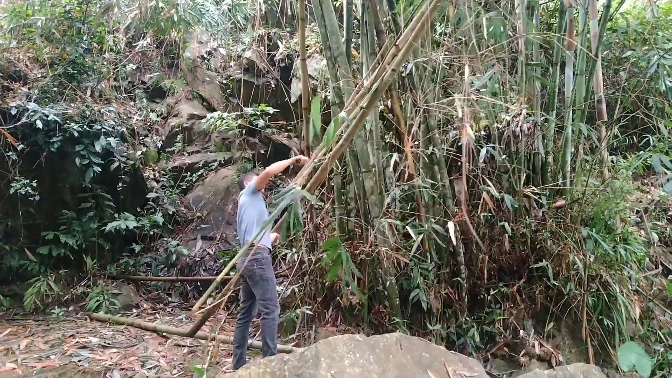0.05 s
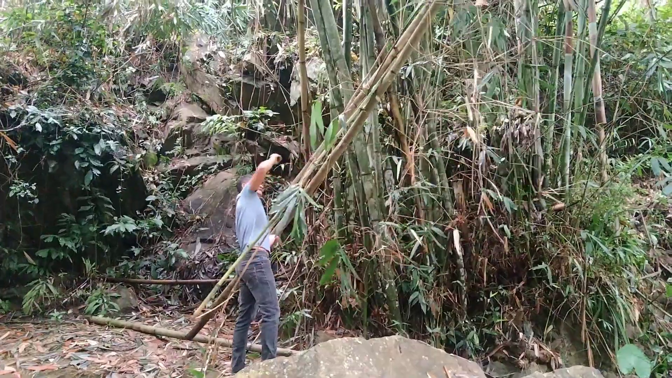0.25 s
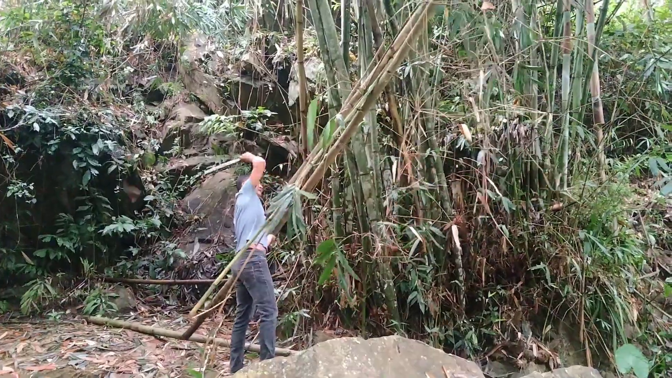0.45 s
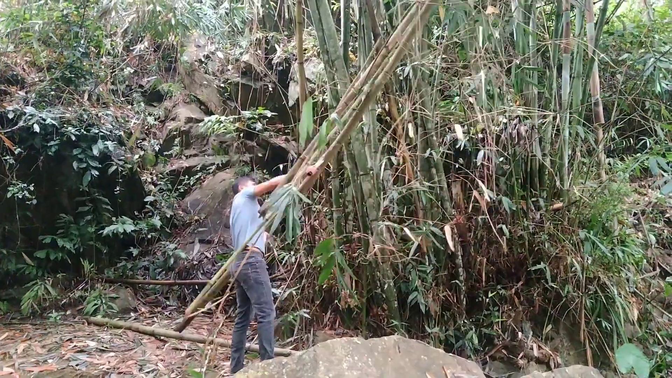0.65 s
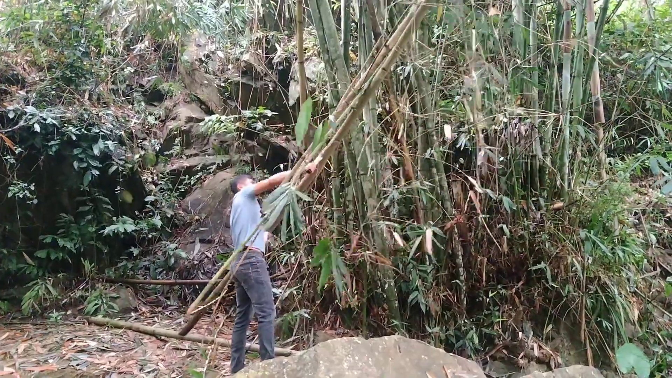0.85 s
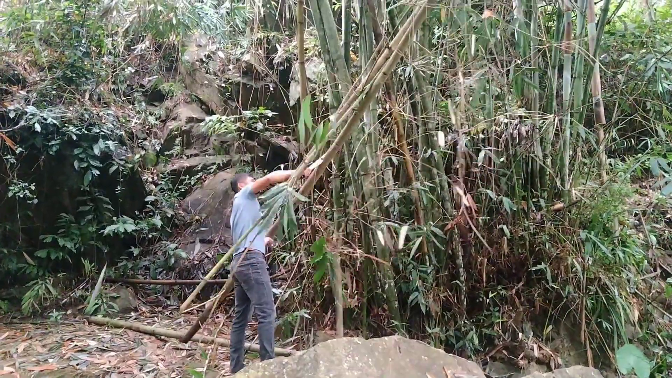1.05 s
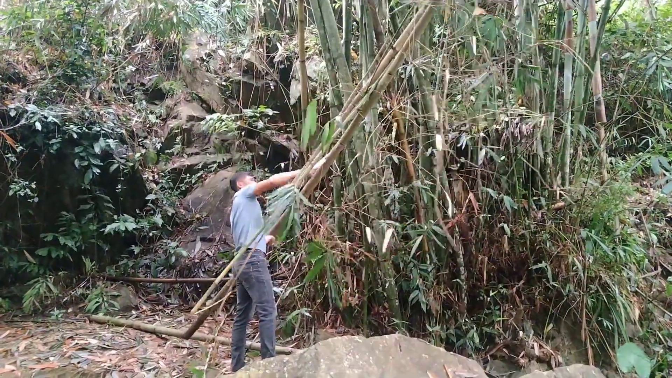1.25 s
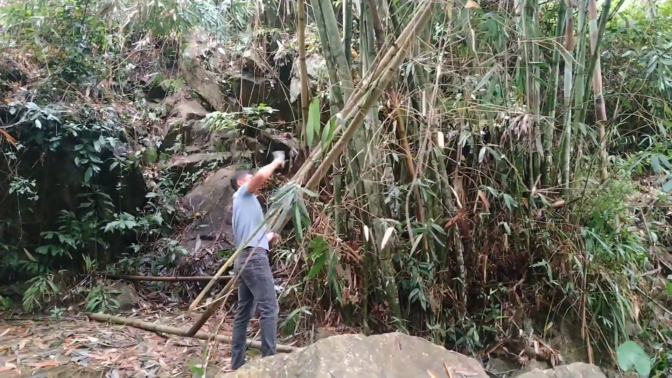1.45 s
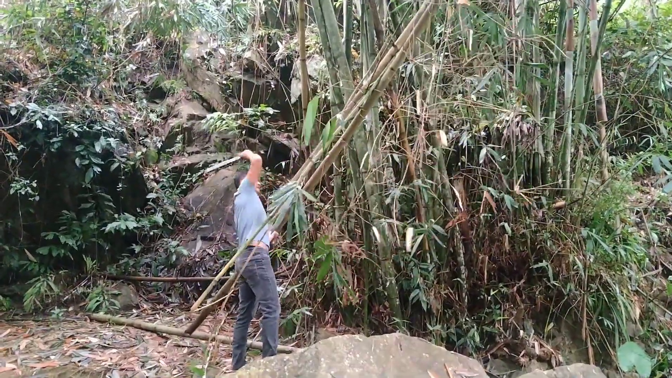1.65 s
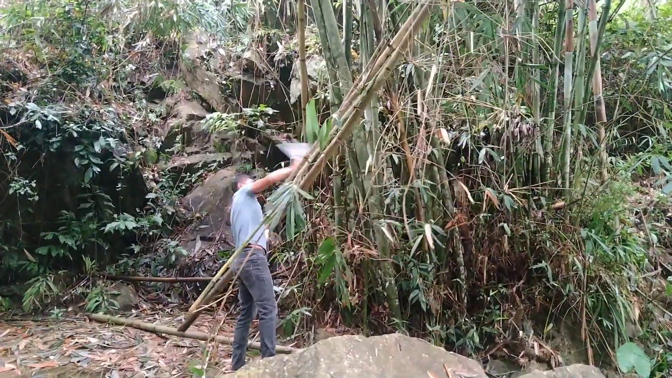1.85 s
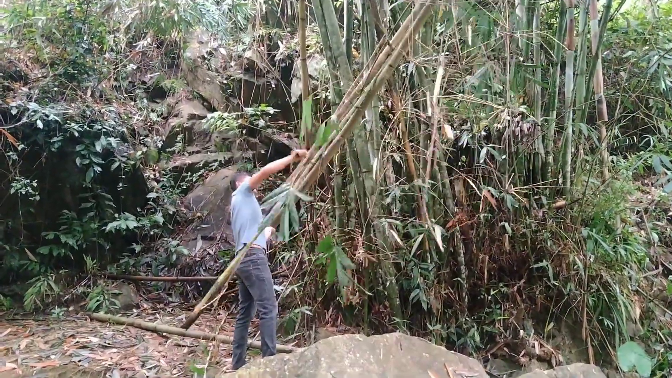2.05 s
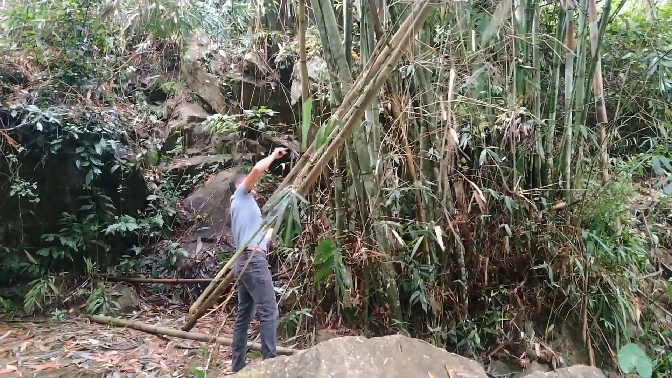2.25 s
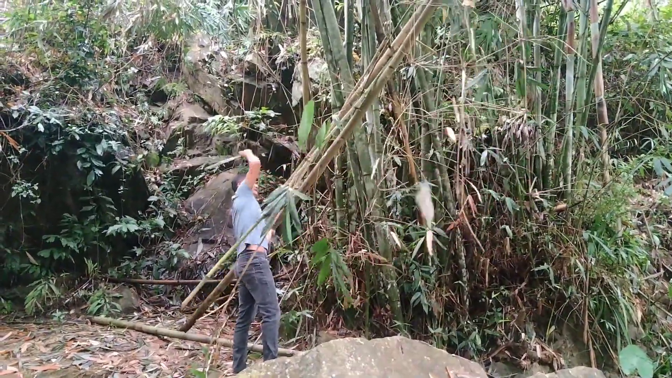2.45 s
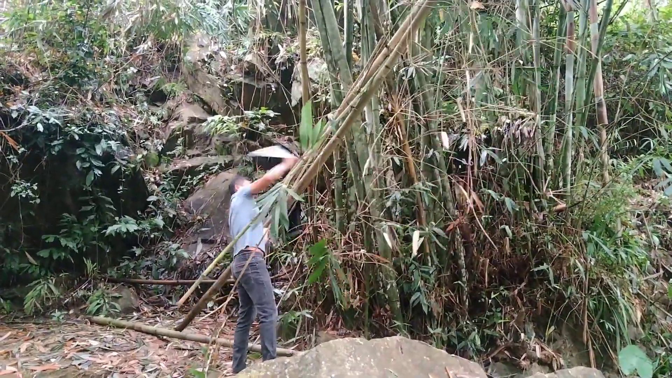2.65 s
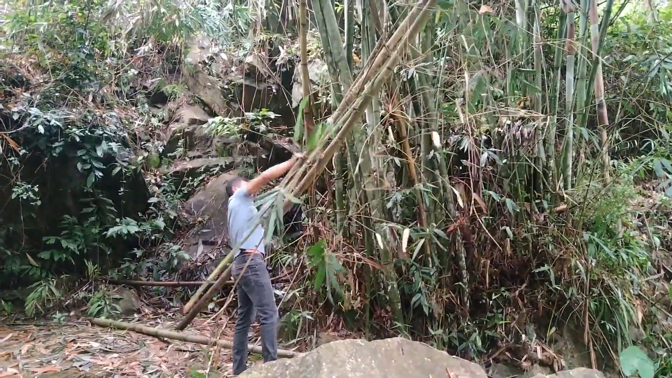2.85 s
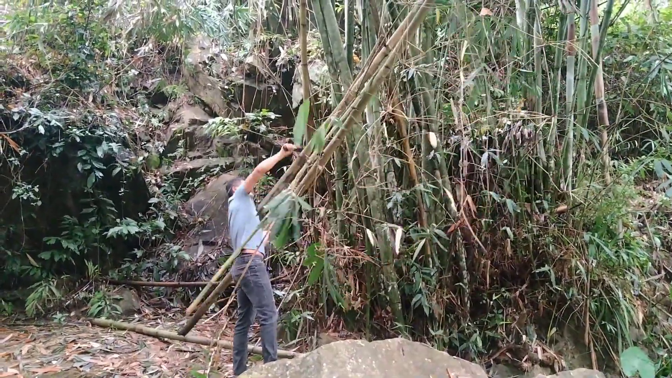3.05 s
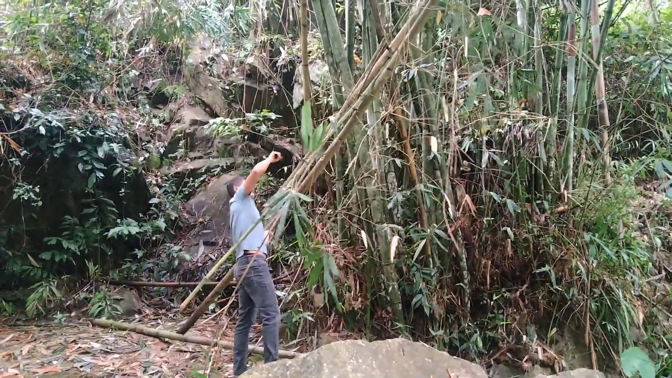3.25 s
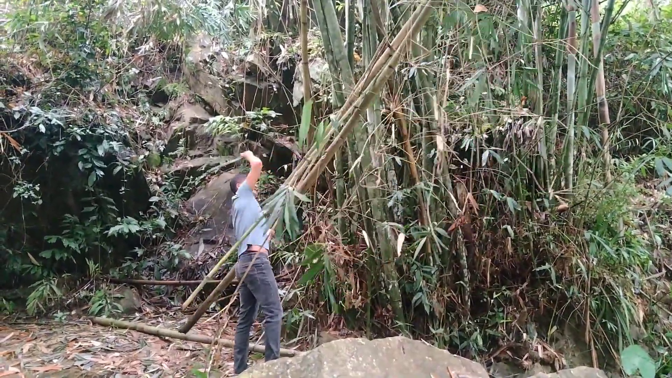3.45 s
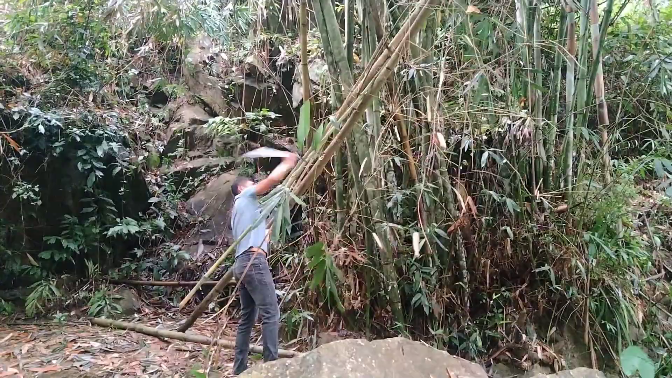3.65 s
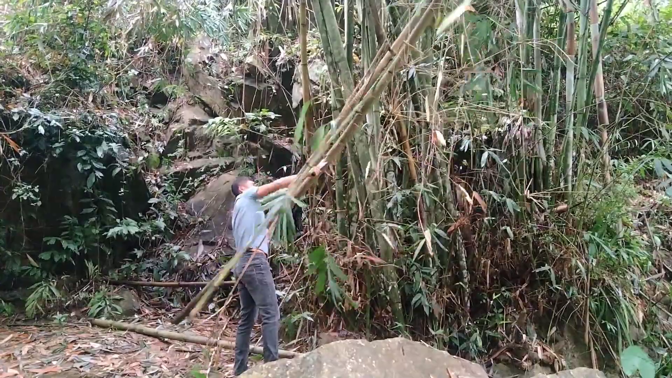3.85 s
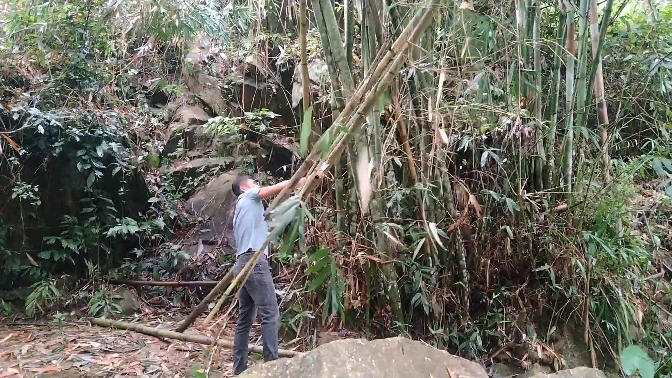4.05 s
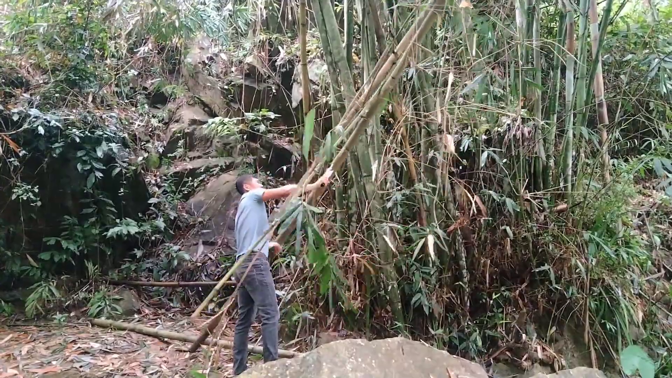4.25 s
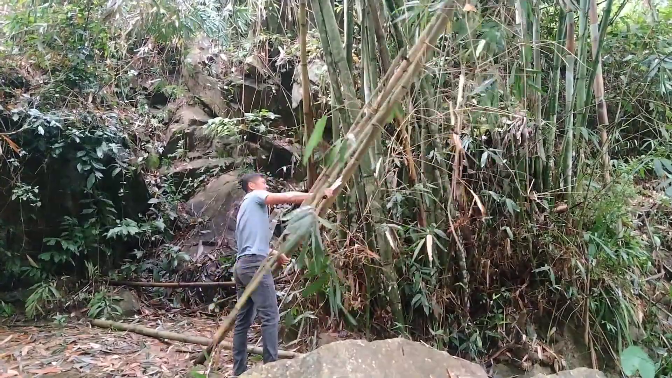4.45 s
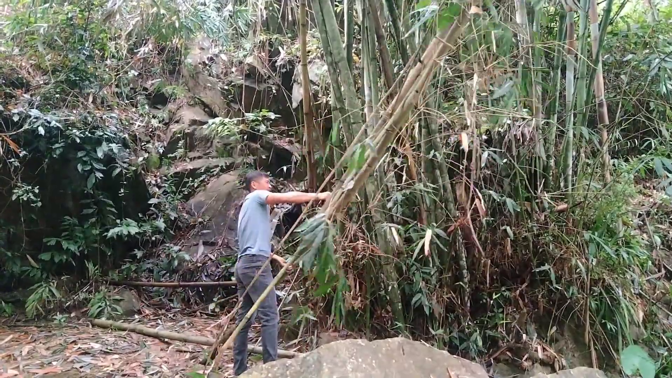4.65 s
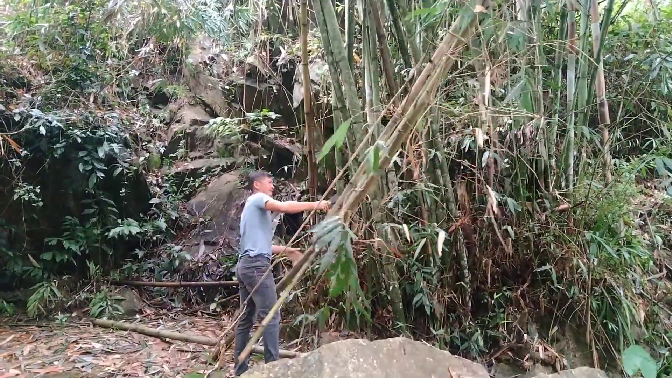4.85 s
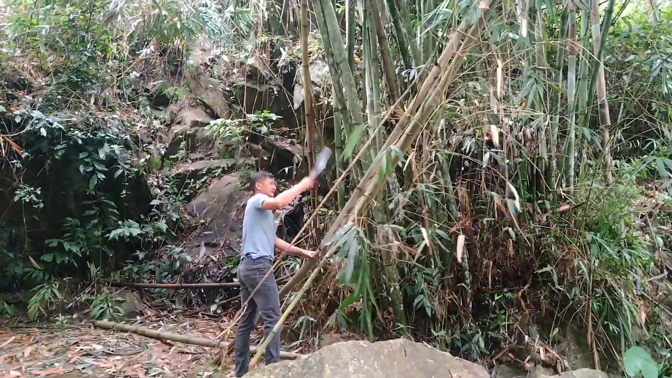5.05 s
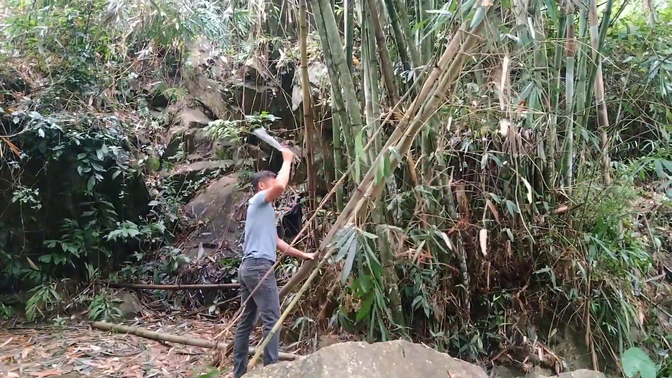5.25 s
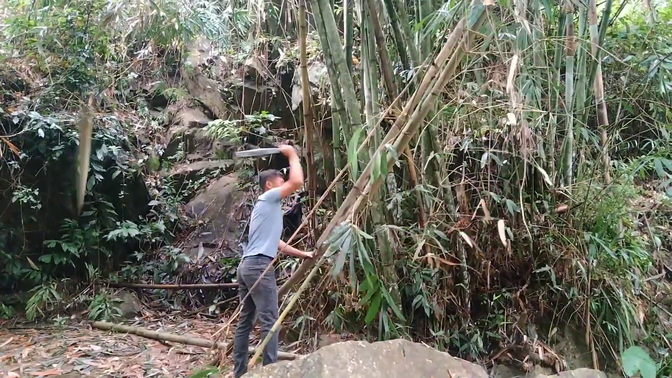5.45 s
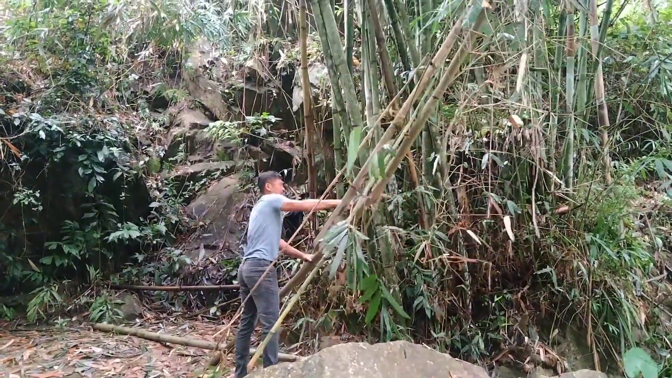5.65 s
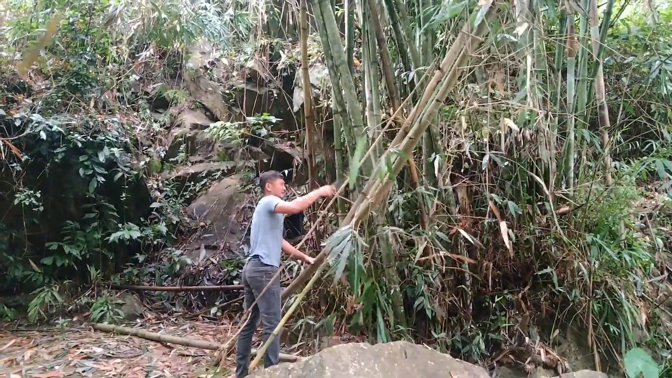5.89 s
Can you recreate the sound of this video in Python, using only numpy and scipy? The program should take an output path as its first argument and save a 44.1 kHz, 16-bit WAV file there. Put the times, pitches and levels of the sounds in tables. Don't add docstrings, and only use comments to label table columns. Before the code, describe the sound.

Five woody chops ring through a bamboo grove with short rocky echoes, dry leaf rattle, splinter ticks and a faint blade clink beside running water.

```python
import sys
import numpy as np
from scipy import signal
from scipy.fft import rfft, irfft
from scipy.io import wavfile
from scipy.ndimage import uniform_filter1d, map_coordinates

SR = 44100
rng = np.random.default_rng(int(sys.argv[2]) if len(sys.argv) > 2 else 0)


def inscribe(sig):
    pcm = np.round(np.clip(np.atleast_2d(sig).T, -1, 1) * 32767)
    wavfile.write(sys.argv[1], SR, pcm.astype(np.int16))


def decibels_to_gain(level_db):
    exponent = np.asarray(level_db, float) / 20
    return 10 ** exponent


N = 261072
T = np.arange(SR // 2) / SR


def unit(x):
    return x / np.sqrt(np.mean(x ** 2) + 1e-20)


def along(points, hz):
    f, v = np.transpose(points)
    return np.interp(np.log(hz + 1), np.log(f + 1), v)


def curve(rows):
    return decibels_to_gain(np.interp(np.arange(N) / SR, *np.transpose(rows)))


def wobble(rate):
    knots = rng.standard_normal(int(N * rate / SR) + 4)
    return map_coordinates(knots, [np.arange(N) * rate / SR])


def coloured(x, spectrum):
    cepstrum = irfft(np.log(decibels_to_gain(along(spectrum, np.fft.rfftfreq(8192, 1 / SR)))))
    cepstrum[1:4096] *= 2
    cepstrum[4097:] = 0
    response = irfft(np.exp(rfft(cepstrum)))
    return signal.fftconvolve(x, response)[:len(x)]


def ring(hz, t60, attack=0.00043):
    return np.sin(2 * np.pi * hz * T) * decibels_to_gain(-60 * T / t60) * (1 - np.exp(-T / attack))


def bright_noise():
    return np.diff(rng.standard_normal(len(T) + 1))


def add(track, s, sound):
    part = track[round(s * SR):][:len(sound)]
    part += sound[:len(part)]


def spiky(size, density, spread_db):
    hit = rng.random(size) < np.clip(density, 0, 1)
    return unit(hit * rng.standard_normal(size) * decibels_to_gain(spread_db * rng.exponential(1, size)))


# start_s, level_db
STREAM_LEVEL = [(0, -39.5), (2, -40), (4.3, -39), (5.7, -40), (5.92, -37)]
# pitch_hz, level_db (per Hz)
WATER_TONE = [(30, -18), (60, 0), (100, 2.5), (160, -6), (250, -3), (600, 4.5), (1500, 3.5), (2500, 3),
              (5000, -7), (8000, 0.5), (11000, -6), (15000, 1.5)]


def stream():
    z = signal.stft(rng.standard_normal(N), nperseg=512)[2]
    patches = uniform_filter1d(rng.standard_normal(z.shape), size=6, axis=0)
    patches = unit(uniform_filter1d(patches, size=8, axis=1))
    hiss = signal.istft(z * decibels_to_gain(1.28 * patches), nperseg=512)[1][:N]
    hiss = unit(coloured(hiss, WATER_TONE))

    when, pitch, size = rng.random((3, 2500))
    hz = 700 * 4.5 ** pitch[:, None]
    t = T[:600]
    life = t * hz / 9
    swell = decibels_to_gain(5.3 * size[:, None] ** 2) * life * np.exp(-5 * life)
    drops = swell * np.sin(2 * np.pi * hz * t * (1 + .15 * life))
    where = (when * N).astype(int)[:, None] + np.arange(len(t))
    bubbles = unit(np.bincount(where.ravel(), drops.ravel())[:N])

    surge = decibels_to_gain(.5 * wobble(9) + .8 * wobble(35))
    return curve(STREAM_LEVEL) * decibels_to_gain(8) * surge * (hiss + decibels_to_gain(-11.5) * bubbles)


# pitch_hz, level_db (per Hz)
LEAF_TONE = [(200, -19.5), (800, 17.5), (2500, 10.5), (6000, 7), (10000, 7), (15000, -17)]
# start_s, level_db
LEAF_SHAKES = [(.77, -28.5), (1.07, -53), (1.13, -44.5), (2.025, -30), (2.119, -34), (2.85, -27),
               (2.95, -40), (3.462, -40.5), (3.866, -26.5), (3.99, -42), (4.28, -53), (4.66, -48.5),
               (4.81, -47.5), (5.74, -26), (5.779, -27), (5.87, -46)]


def leaves():
    rise_s, scrape_t60_s, patter_t60_s = 0.014, 0.37, 1.3
    patter_db, still_db = -14.5, -54
    start_s, level_db = np.transpose(LEAF_SHAKES)[:, :, None]
    since = np.maximum(np.arange(N) / SR - start_s, 0)
    swell = decibels_to_gain(level_db + 6) * (1 - np.exp(-since / rise_s)) ** 2

    def shaking(t60):
        return np.sqrt(((swell * decibels_to_gain(-60 * since / t60)) ** 2).sum(axis=0))

    clumps = spiky(N, density=.3, spread_db=1.5) * decibels_to_gain(1.9 * wobble(40))
    scrape = unit(coloured(clumps, LEAF_TONE))
    patter = unit(np.diff(coloured(spiky(N + 1, density=.3, spread_db=2.0), LEAF_TONE)))
    scraping = (shaking(scrape_t60_s) + decibels_to_gain(still_db)) * scrape
    return decibels_to_gain(8) * (scraping + decibels_to_gain(patter_db) * shaking(patter_t60_s) * patter)


# pitch_hz, level_db (per Hz)
TEARING_TONE = [(100, -35.5), (350, -12), (700, 9), (1200, 1), (2600, -6.5), (3600, -9.5), (6000, -7),
                (10000, -12.5), (15000, -10.5)]


def crack(db, hz, tear_db):
    tear = unit(coloured(spiky(len(T), density=0.45, spread_db=1.0), TEARING_TONE))
    puff = decibels_to_gain(tear_db) * tear * decibels_to_gain(-60 * T / 0.022)
    return decibels_to_gain(db + 6.5) * (ring(hz, 9 / hz) + puff)


# pitch_hz, t60_s
GROVE_DECAY = [(150, 0.51), (400, 0.35), (1000, 0.23), (2800, 0.33), (7000, 0.3), (15000, 0.32)]


def grove(sound, echo_db):
    hz, t, z = signal.stft(rng.standard_normal(len(T)), SR, nperseg=256)
    fading = z * decibels_to_gain(-60 * t / along(GROVE_DECAY, hz)[:, None])
    tail = signal.istft(fading, SR, nperseg=256)[1][:len(T)]
    rocks = 0.27 / (1 + np.exp((.024 - T) / 0.0021))
    first_answer = 0.2 * np.exp(-.5 * ((T - .028) / 0.0054) ** 2)
    tail *= .5 + rocks + first_answer
    return decibels_to_gain(echo_db) * signal.fftconvolve(sound, tail / np.linalg.norm(tail))


# start_s, level_db (peak), pitch_hz
BLOW_CRACKS = [
    [(.7676, -5, 2270), (.7702, -4.5, 2390), (.7735, -6.5, 890), (.7778, -7, 2140), (.781, -17, 1950),
     (.7945, -24, 1510), (.801, -18, 2000)],
    [(2.0236, -12, 2540), (2.0295, -11, 2720), (2.0315, -8.5, 1430), (2.0355, -8, 1280)],
    [(2.8463, -3.5, 1390), (2.848, -3, 1310), (2.852, -3.5, 1430), (2.8555, -5.5, 2560), (2.859, -5, 2560),
     (2.876, -9, 1250)],
    [(3.8632, -9.5, 1390), (3.867, -3.5, 4130), (3.8685, -8.5, 1000), (3.8716, -4.5, 1500),
     (3.878, -17, 730), (3.9365, -28, 1420)],
    [(5.7343, -4.5, 980), (5.7365, -12, 1250), (5.7398, -6, 860), (5.7425, -13, 2000), (5.7493, -12, 1900),
     (5.759, -6.5, 1890), (5.7645, -6, 1500)],
]
# pitch_hz, width_hz, level_db
STEM_WALLS = [
    [(344, 110, -4), (1392, 17, 4), (1510, 38, -1), (2000, 20, 4), (2510, 37, -6)],
    [(385, 44, 13), (790, 52, 7), (1250, 170, -2), (2010, 26, -16), (2800, 25, -22)],
    [(323, 150, -21), (1300, 110, -20), (1390, 120, -0.5), (2450, 46, 2), (2850, 90, -8)],
    [(312, 33, -36), (1590, 180, 9), (1770, 45, -6), (2420, 260, 7), (3050, 16, -30)],
    [(623, 330, 15), (1380, 87, 2), (1880, 26, -26), (2000, 37, -15), (2410, 140, 6)],
]
# stem_ring_db, hollow_hz, hollow_db, steel_edge_db, tearing_db
BLOW_LEVELS = [(5, 348, -7, -5, -9.5), (-3.5, 430, -10, -4.5, -10.5), (2, 325, -3, -5.5, -7.5),
               (4, 319, -7.5, -20, -5), (4.5, 618, 1, -8.5, -3.5)]
STEM_SWAY = [176.6, 184, 175, 239, 236]


def chops():
    out = np.zeros(N)
    for cracks, stem, sway_hz, levels in zip(BLOW_CRACKS, STEM_WALLS, STEM_SWAY, BLOW_LEVELS):
        ring_db, hollow_hz, hollow_db, edge_db, tear_db = levels
        start = cracks[0][0]
        bite = decibels_to_gain(-60 * T / 0.017) + decibels_to_gain(1.5 - 60 * T / 0.0022)
        blow = decibels_to_gain(edge_db) * bite * bright_noise()
        for s, db, hz in cracks:
            add(blow, s - start, crack(db, hz, tear_db))
        wall = sum(decibels_to_gain(db) * ring(hz, 2.7 / max(width * 2.55, 100)) for hz, width, db in stem)
        blow += decibels_to_gain(ring_db - 37) * signal.fftconvolve(blow, wall)[:len(T)]
        hollow = decibels_to_gain(hollow_db) * ring(hollow_hz, 0.045, attack=0.006)
        hollow += decibels_to_gain(-32.5) * ring(sway_hz, 0.15, attack=0.0095)
        add(out, start, blow + 0.27 * hollow)
        add(out, start, grove(blow + hollow, echo_db=-2.5))
    return out


# start_s, level_db, pitch_hz
SPLINTER_TICKS = [
    (.847, -7.5, 3120),
    (1.084, -16, 14000),
    (1.147, -28, 5170),
    (1.15, -18.5, 2570),
    (1.162, -24, 2700),
    (1.156, -32, 8060),
    (1.207, -25, 5030),
    (2.974, -12, 7350),
    (4.826, -25, 5100),
    (5.758, -4, 6560),
]


def ticks():
    out = np.zeros(N)
    for s, db, hz in SPLINTER_TICKS:
        burst = decibels_to_gain(-5 - 60 * T / 0.0041) * rng.standard_normal(len(T))
        add(out, s, decibels_to_gain(db) * (ring(hz, 0.0076) + burst))
    return out


# start_s, level_db (peak), pitch_hz, tearing_db, hollow_db
STEM_KNOCKS = [(1.007, -44, 2180, -8, -11), (1.108, -24.5, 1370, -22, 7), (1.135, -24.5, 1386, -16, -16),
               (1.145, -24, 1380, -22, 14), (1.155, -19, 1134, -6.5, -21), (1.969, -26.5, 2010, -7, -11),
               (2.133, -23, 1910, -10, 8), (2.973, -27, 2780, -9, 11), (3.729, -34, 2400, -5, -10),
               (4.008, -23, 2370, -5, -9), (4.308, -23, 1526, -10, -19), (4.368, -28, 2370, -6, -15),
               (4.465, -28.5, 2610, -3, -7), (4.698, -27, 1510, -2.5, 4), (4.824, -29, 1390, -2, -2),
               (4.847, -27.5, 500, -14, -16), (5.011, -27, 2486, -3.5, 0)]


def knocks():
    out = np.zeros(N)
    for s, db, hz, tear_db, hollow_db in STEM_KNOCKS:
        bump = crack(db, hz, tear_db - 1)
        bump += decibels_to_gain(db - 0.5) * ring(hz, 0.042, attack=0.0038)
        bump += decibels_to_gain(db + hollow_db) * ring(418, 0.027, attack=0.013)
        add(out, s, bump)
        add(out, s, grove(bump, echo_db=-2.5))
    return out


# start_s, level_db, fall_s, recovery_s, settling_s
CHIP_TAP = (2.0246, -4.5, .00022, .0009, .0035)


def chip():
    s, db, fall, recovery, settling = CHIP_TAP
    t = np.arange(N) / SR - s
    dip = np.where(t < 0, np.exp(-(t / fall) ** 2), np.exp(-np.abs(t) / recovery))
    swell = np.exp(-.5 * ((t - .0015) / settling) ** 2)
    return decibels_to_gain(db) * (swell * dip.sum() / swell.sum() - dip)


# start_s, level_db, middle_modes_db, upper_modes_db, stem_knock_db
BLADE_CLINKS = [
    (3.4269, -21, -1.5, 4, -45),
    (3.4682, -22.5, 4, -3, -22.5),
    (3.508, -42, -7.5, -8, -34),
]
# pitch_hz, level_db, t60_s
BLADE_MODES = [(1268, -1, 0.16), (2420, 1, 0.032), (2750, -6, 0.052), (3630, 0, 0.045), (5000, -3, 0.024),
               (6000, -2, 0.026), (7660, -5, 0.04)]


def blade():
    out = np.zeros(N)
    for s, db, middle_db, upper_db, knock_db in BLADE_CLINKS:
        touch = crack(db - 3, 2200, -5)
        for hz, level, t60 in BLADE_MODES:
            if hz < 2000:
                share_db = 0
            elif hz < 3000:
                share_db = middle_db
            else:
                share_db = upper_db
            touch += decibels_to_gain(db + level + share_db) * ring(hz, t60, attack=0.00076)
        touch += decibels_to_gain(db + 2.5 - 60 * T / 0.04) * bright_noise()
        touch += decibels_to_gain(knock_db) * ring(385, 0.041, attack=0.002)
        add(out, s, touch)
        add(out, s, grove(touch, echo_db=-9.5))
    return out


def scene():
    return (stream() + leaves() + chops() + ticks() + knocks() + blade())[None]


def roll_off(x):
    return signal.sosfilt(signal.butter(12, 16810, fs=SR, output="sos"), x)


# pitch_hz, level_db
MIC_TONE = [(25, -31), (60, -16.5), (200, 1), (900, -11.5), (1150, -8.5), (1380, -2.5), (1800, -5.5),
            (2480, 0), (3300, -4.5), (4500, -5.5), (7600, -11), (9000, -21.5), (11000, -21), (15000, -17.5)]
# pitch_hz, level_db
WEAKEST_KEPT = [(8400, -110), (9000, -77), (9300, -81), (9600, -115), (10000, -82.5), (11800, -82.5),
                (12600, -86), (15500, -100), (15620, -54), (16200, -52), (17000, -46)]


def record(dry):
    heard = coloured(dry[0], MIC_TONE) + chip()
    heard = heard / (1 + np.abs(heard / .75) ** 4) ** .25
    heard = signal.sosfilt(signal.butter(2, 45, 'high', fs=SR, output='sos'), heard)
    hz, _, z = signal.stft(heard, SR, nperseg=1024)
    power = uniform_filter1d(np.abs(z) ** 2, size=8, axis=0)
    band = np.sqrt(np.abs(uniform_filter1d(power, size=2, axis=1)))
    threshold = decibels_to_gain(along(WEAKEST_KEPT, hz))[:, None]
    kept = 1 / (1 + (threshold / (band + 1e-9)) ** 12)
    heard = signal.istft(z * kept, SR, nperseg=1024)[1][:N]
    return roll_off(heard[None])


dry = scene()
out = record(dry)
inscribe(out)
```